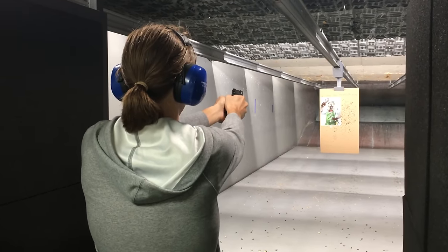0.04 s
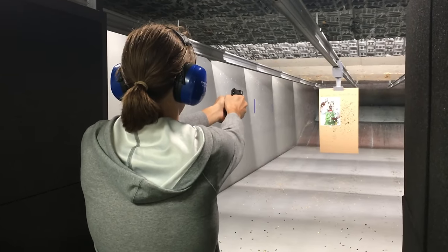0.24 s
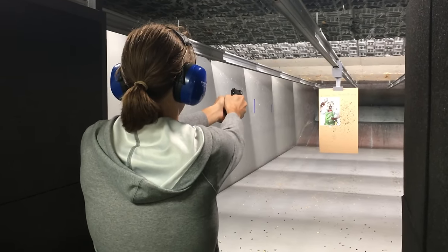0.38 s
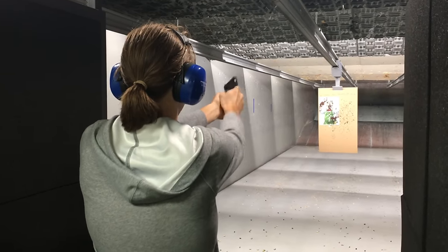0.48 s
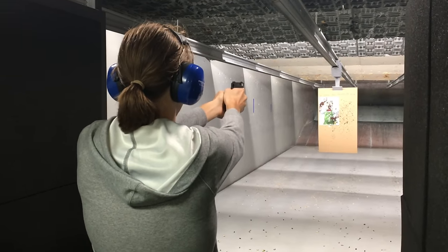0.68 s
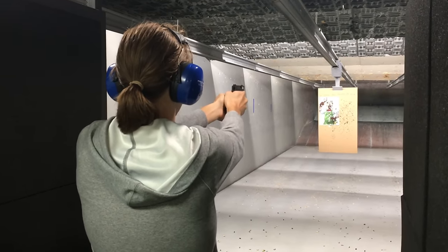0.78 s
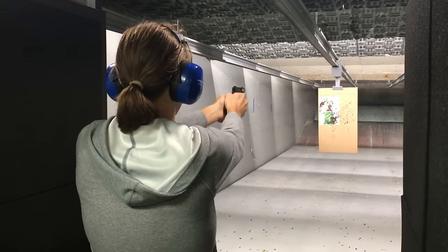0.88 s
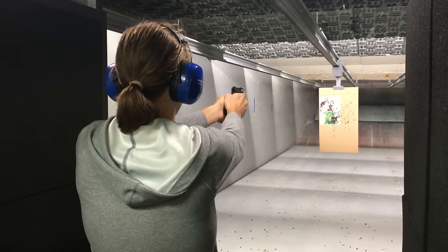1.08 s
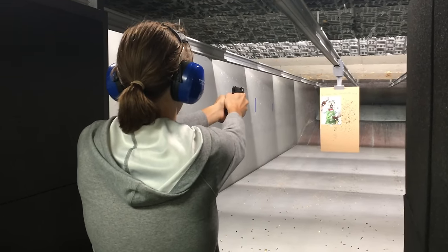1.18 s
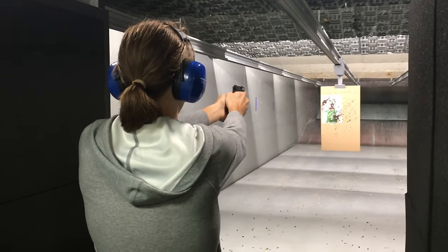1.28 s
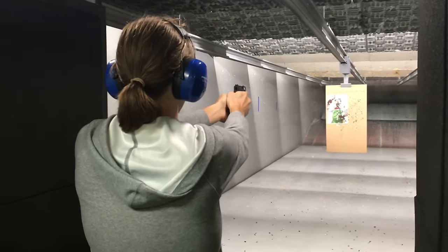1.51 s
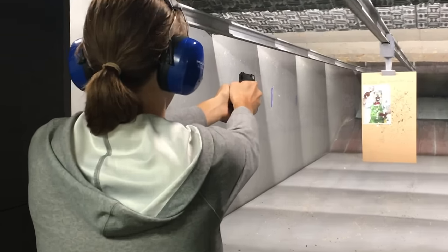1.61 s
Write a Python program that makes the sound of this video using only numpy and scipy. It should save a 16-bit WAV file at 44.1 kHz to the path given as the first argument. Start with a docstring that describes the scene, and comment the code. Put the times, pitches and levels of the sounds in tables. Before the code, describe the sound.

One pistol shot blasts and booms indoors, its echo fading before a spent case faintly pings.

```python
"""One pistol shot in a booth of an indoor range, heard in mono from just behind the shooter.
Blast, boom and crack are bursts of coloured noise that rattle round the booth; slow pressure waves thump
the microphone. Hard slaps, the hall and a long echo return from down the range, and the spent case pings
as decaying sines. Behind it all is ventilation rumble, steady filtered noise. The recorder's gain control
ducks everything at the shot and lets the rumble creep back."""
import sys
import numpy as np
from scipy import signal
from scipy.fft import rfft, irfft, next_fast_len
from scipy.io import wavfile
from scipy.ndimage import uniform_filter1d

SR = 44100
rng = np.random.default_rng(int(sys.argv[2]) if len(sys.argv) > 2 else 0)


def materialize(psi):
    """Save the field psi as 16-bit PCM at rate SR to the path in sys.argv[1].

    A 1-D psi becomes a single channel; in a 2-D psi each row is a channel.
    """
    bounded = np.clip(np.atleast_2d(psi).T, -1, 1)
    quanta = np.round(bounded * 32767).astype(np.int16)
    wavfile.write(sys.argv[1], SR, quanta)


N = 72765
T = np.arange(N) / SR
SIZE = next_fast_len(N + 4096)
HZ = np.fft.rfftfreq(SIZE, 1 / SR)


def amp(db):
    """Decibels to gain."""
    return 10 ** (np.asarray(db) / 20)


def unit(x):
    """Scales to rms 1."""
    return x / np.sqrt(np.mean(x ** 2) + 1e-20)


def read(points, hz):
    """Reads a table on a log-frequency axis."""
    f, value = np.transpose(points)
    return np.interp(np.log(hz + 1), np.log(f), value)


def noise(colour_db, grain_db=0):
    """A dense train of reflections of uneven size and random sign, coloured, at rms 1."""
    sizes = amp(grain_db * np.minimum(rng.exponential(1, SIZE), 4))
    reflections = rng.choice([-1., 1.], SIZE) * sizes
    return unit(irfft(rfft(reflections) * amp(colour_db), SIZE))


def strike(start, rise, t60):
    """A straight rise, then an exponential decay of 60 dB in t60 seconds."""
    age = T - start
    decay = amp(-60 * np.maximum(age - rise, 0) / t60)
    return np.clip(age / rise, 0, 1) * decay


def flutter(depth_db, order):
    """Reflections arrive in clumps a few milliseconds long; order is the smoothing in samples."""
    smooth = uniform_filter1d(uniform_filter1d(rng.standard_normal(N), order), order)
    return amp(depth_db * unit(smooth))


def burst(event, colour_db, decay, grain_db):
    """A burst of reflections in which each band dies at its own speed."""
    start, rise, db, t60 = event
    spectrum = rfft(noise(colour_db, grain_db))
    out = np.zeros(N)
    centres = np.geomspace(60, 15000, 12)
    # each row of the identity picks one band, overlapping its neighbours
    for hz, pick in zip(centres, np.eye(len(centres))):
        weight = read(np.c_[centres, pick], HZ)
        band = irfft(spectrum * weight, SIZE)[:N]
        out += band * strike(start, rise, t60 * read(decay, hz))
    return amp(db) * out


# The shot at close range in the booth: (time [s], rise [s], level [dB], t60 [s])
LEAD_EVENT = (.454, 0.0082, 2.5, 0.28)
BLAST_EVENT = (.4642, 0.0034, 15.8, 0.21)
BOOM_EVENT = (.5, 0.008, 18.2, 0.053)
CRACK_EVENT = (.5104, 0.00053, 12.6, 0.38)
# Their relative spectra; the lead shares the blast's: (frequency [Hz], density [dB per Hz])
BLAST_SPECTRUM = [(60, -23.5), (130, -6), (200, -4.5), (270, -12), (365, 6), (480, -7.5), (774, -8.5),
                  (1050, -3.5), (1430, -4), (1710, -4), (2660, -17), (3240, -10.5), (3870, -18),
                  (8550, -24.5), (15500, -37)]
BOOM_SPECTRUM = [(60, 5), (200, 0), (450, -17), (730, 4.5), (1100, -6), (1700, -3), (3000, -7.5),
                 (3900, -19.5), (8000, -56), (15000, -55.5)]
CRACK_SPECTRUM = [(60, -2), (150, -1), (258, -3.5), (362, -19), (450, -5), (600, -2), (790, -12),
                  (1310, -7), (3050, -22), (4750, -22), (5870, -18), (9000, -22.5), (15500, -25)]
# Ring time of the booth against the t60 above: (frequency [Hz], factor [1])
BOOTH_RING = [(80, 0.53), (250, 1.08), (600, 1.5), (1200, 1.2), (3000, 0.92), (8000, 0.84), (15000, 0.55)]
# Booth resonances, a negative boost being a dip: (frequency [Hz], boost [dB])
BOOTH_RESONANCES = [(253, 7), (333, 7), (409, 6.5), (531, 5.5), (731, 4), (975, 6), (1366, 6), (1545, -11),
                    (1624, 5.5), (1730, 2), (2202, 5), (2634, 8), (2804, 7.5), (2914, 1)]
MODE_WIDTH_HZ = 24


def shot():
    """The muzzle blast, its boom and its bright crack ring in the resonances of the booth."""
    booth_db = sum(db / (1 + ((HZ - hz) / (MODE_WIDTH_HZ / 2)) ** 2) for hz, db in BOOTH_RESONANCES)
    parts = [
        (LEAD_EVENT, BLAST_SPECTRUM),
        (BLAST_EVENT, BLAST_SPECTRUM),
        (BOOM_EVENT, BOOM_SPECTRUM),
        (CRACK_EVENT, CRACK_SPECTRUM),
    ]
    bursts = sum(burst(event, read(colour, HZ) + booth_db, BOOTH_RING, grain_db=3.5)
                 for event, colour in parts)
    return flutter(depth_db=1.5, order=80) * bursts


# Pressure waves at the microphone:
# (time of the middle of the wave [s], frequency [Hz], half length to 1/e [s], level [dB])
PRESSURE_WAVES = [(.469, 111.6, 0.01, 8), (.5325, 95, 0.0035, 14.5), (0.545, 62, 0.01, 8),
                  (0.563, 61.6, 0.013, 13)]


def thumps():
    """A few slow swings of air pressure with the blast and after it: sines under bell-shaped envelopes."""
    out = np.zeros(N)
    for centre, hz, half, db in PRESSURE_WAVES:
        offset = T - centre
        out -= amp(db) * np.sin(2 * np.pi * hz * offset) * np.exp(-(offset / half) ** 2)
    return out


# Sharp returns off hard surfaces: (time [s], level [dB], t60 [s], tilt [dB per octave])
SLAP_RETURNS = [(0.4773, 8, 0.025, 2), (0.5107, 11, 0.048, 7), (0.5405, 5.5, 0.15, 4),
                (0.6363, -1, 0.073, 1.5), (0.637, 10, 0.034, -2), (0.6488, 8, 0.033, 1.5),
                (0.658, -2.5, 0.17, 0.5)]
# Their shared relative spectrum before the tilt: (frequency [Hz], density [dB per Hz])
SLAP_SPECTRUM = [(100, -16), (200, -20), (700, -7), (1100, 7), (1400, -7.5), (2200, -9), (2900, -17),
                 (3600, -10), (6900, -18), (10000, -21.5), (15500, -33.5)]


def slaps():
    """Short, hard returns from the booth and from down the range, each with its own tilt."""
    octaves = np.log2((HZ + 1) / 1000)  # the tilt pivots at 1 kHz
    out = np.zeros(N)
    for start, db, t60, tilt in SLAP_RETURNS:
        colour_db = read(SLAP_SPECTRUM, HZ) + tilt * octaves
        reflections = noise(colour_db, grain_db=1.5)[:N]
        out += amp(db) * reflections * strike(start, rise=.0003, t60=t60)
    return out


# The hall round the booths and the echo from its far end: (time [s], rise [s], level [dB], t60 [s])
HALL_EVENT = (0.5289, 0.1042, -5, 1.61)
FAR_EVENT = (0.7195, 0.03, 2.2, 1.233)
# Their relative spectra: (frequency [Hz], density [dB per Hz])
HALL_SPECTRUM = [(60, -11), (200, -2), (400, -6), (650, -2.5), (1100, -1.5), (1600, -4), (2400, -9),
                 (5000, -12), (9000, -15.5), (15000, -31.5)]
FAR_SPECTRUM = [(30, -47), (55, -6), (87, -1), (165, -6), (329, -8), (483, -11), (658, -3.5), (876, -5.5),
                (1170, -3.5), (1750, -11), (2100, -15.5), (3500, -21.5), (5640, -29), (9000, -42.5),
                (15000, -67)]
# Ring time of the hall against the t60 above: (frequency [Hz], factor [1])
HALL_RING = [(60, 2.14), (200, 1.34), (400, 0.73), (1000, 1.34), (1600, 1.04), (2600, 0.99), (5000, 0.64),
             (9000, 0.39), (15000, 0.28)]


def hall():
    """The long room rings, and its far end sends back a dull echo; the treble dies first."""
    near = burst(HALL_EVENT, read(HALL_SPECTRUM, HZ), HALL_RING, grain_db=3)
    far = burst(FAR_EVENT, read(FAR_SPECTRUM, HZ), HALL_RING, grain_db=1.5)
    return (near + far) * flutter(depth_db=0.87, order=200)


# The tick of the case, relative spectrum: (frequency [Hz], density [dB per Hz])
TICK_SPECTRUM = [(2000, -30), (4500, -6), (5700, 8), (7500, -7.5), (9000, -3), (12000, 5.5), (15500, -9)]
# Its ringing modes: (frequency [Hz], level against RING_DB [dB], t60 [s])
CASE_RING = [(10950, -3, .28), (10985, -6, .34), (11064, 0, .42), (11098, -2, .32)]
CASE_S = 1.3155
TICK_DB, TICK_T60_S, RING_DB = -31, 0.062, -38


def spent_case():
    """The brass case strikes something hard and rings in two close pairs of modes."""
    tick = noise(read(TICK_SPECTRUM, HZ))[:N] * strike(CASE_S, rise=0.0016, t60=TICK_T60_S)
    ring = np.zeros(N)
    for hz, db, t60 in CASE_RING:
        tone = np.sin(2 * np.pi * (hz * T + rng.random()))  # random phase
        ring += amp(db) * tone * strike(CASE_S, rise=0.007, t60=t60)
    return amp(TICK_DB) * tick + amp(RING_DB) * ring


# Ventilation behind everything, relative spectrum: (frequency [Hz], density [dB per Hz])
VENT_SPECTRUM = [(15, -47), (28, -33), (50, 2), (108, 0), (168, -14.5), (260, -16), (420, -30), (760, -36),
                 (950, -32), (1280, -39), (1870, -37.5), (2800, -46), (3400, -39), (4500, -44), (6500, -45),
                 (9700, -50.5), (12000, -58.5), (15500, -63)]
VENT_DB = -23.5  # rms, before the recorder


def ventilation():
    """Steady duct rumble with a soft hiss of air, as stationary filtered noise."""
    return amp(VENT_DB) * noise(read(VENT_SPECTRUM, HZ))[:N]


def scene():
    """All sources at one microphone, the same in both channels."""
    mono = shot() + thumps() + slaps() + hall() + spent_case() + ventilation()
    return np.tile(mono, (2, 1))


DUCK_FROM_DB, DUCK_MAX_DB, RECOVER_DB_PER_S = -35.5, 21.5, 28.5
EDGE_HZ = 15800


def record(dry):
    """Gain control that ignores the bass, soft overload, then the band limit."""
    highpass = signal.butter(2, 400, "high", fs=SR, output="sos")
    sensed = signal.sosfilt(highpass, dry[0])
    level_db = 10 * np.log10(abs(uniform_filter1d(sensed ** 2, size=120)) + 1e-12)
    wanted_db = np.clip(level_db - DUCK_FROM_DB, 0, DUCK_MAX_DB)
    # a running maximum against a rising ramp: instant duck, straight recovery in dB
    recovery = RECOVER_DB_PER_S * T
    duck_db = np.maximum.accumulate(wanted_db + recovery) - recovery
    ducked = dry * amp(-uniform_filter1d(duck_db, size=40))  # eased over 40 samples
    overloaded = ducked / (1 + ducked ** 6) ** (1 / 6)
    lowpass = signal.firwin(511, EDGE_HZ, window=("kaiser", 9), fs=SR)
    return signal.oaconvolve(overloaded, lowpass[None], "same")


dry = scene()
out = record(dry)
materialize(out)
```